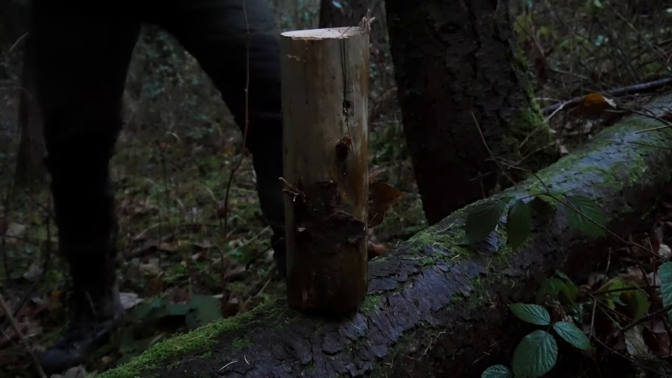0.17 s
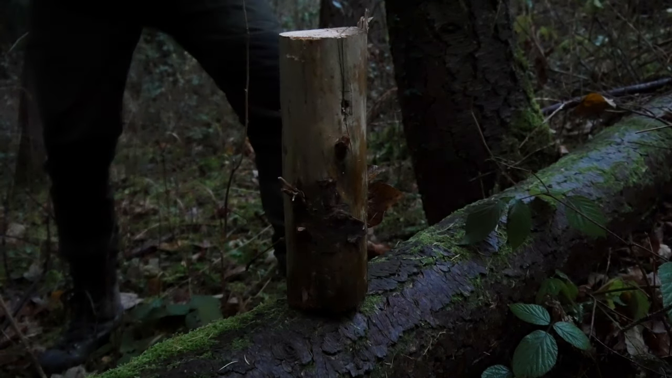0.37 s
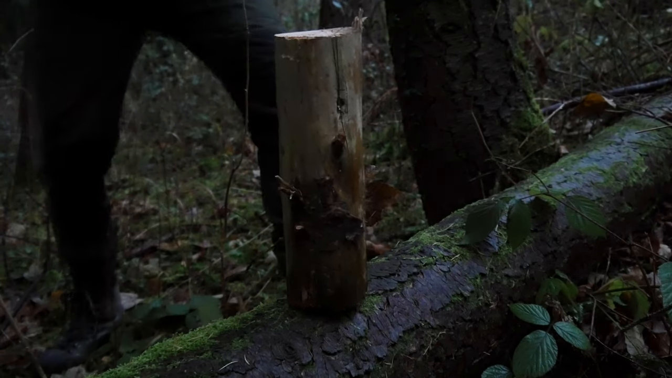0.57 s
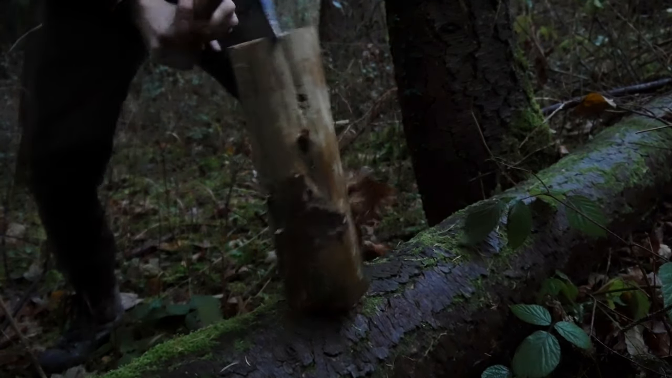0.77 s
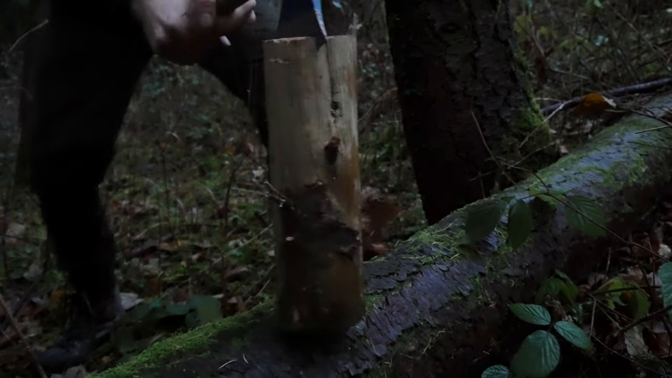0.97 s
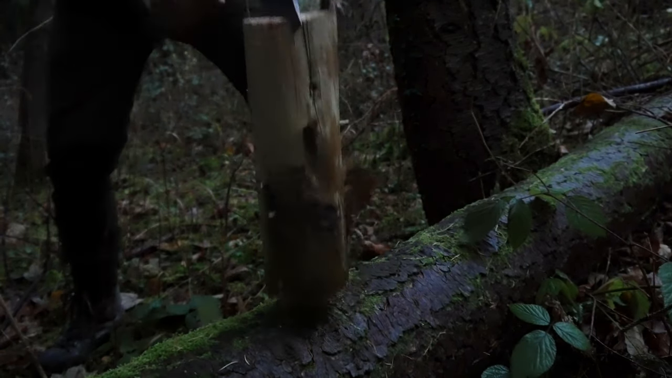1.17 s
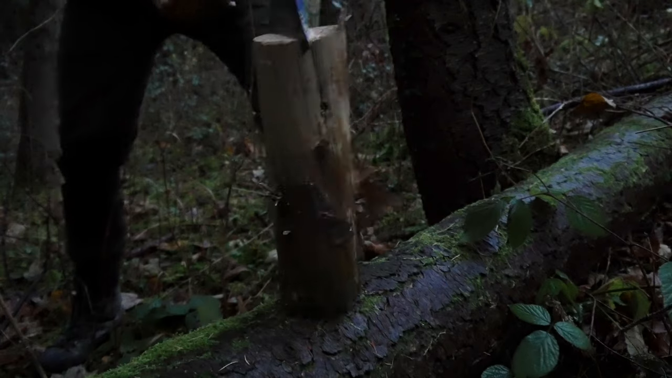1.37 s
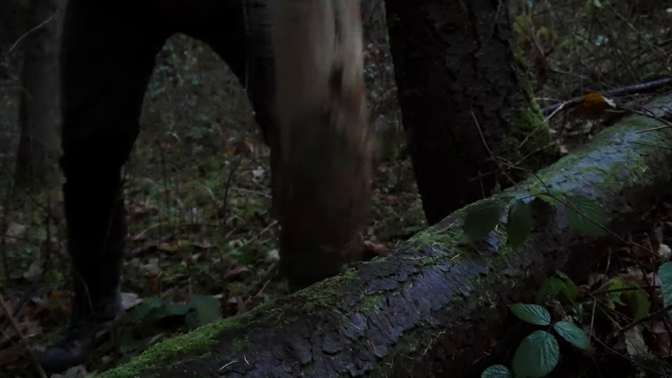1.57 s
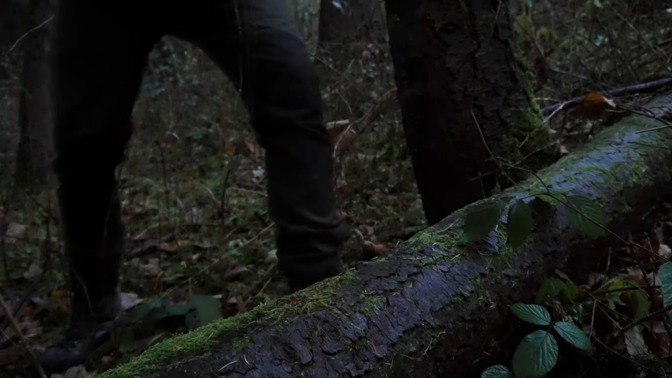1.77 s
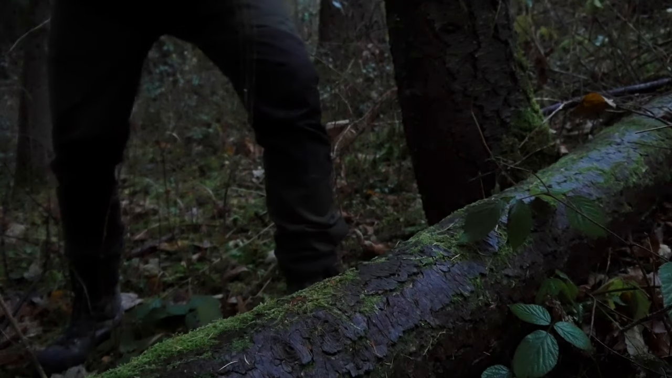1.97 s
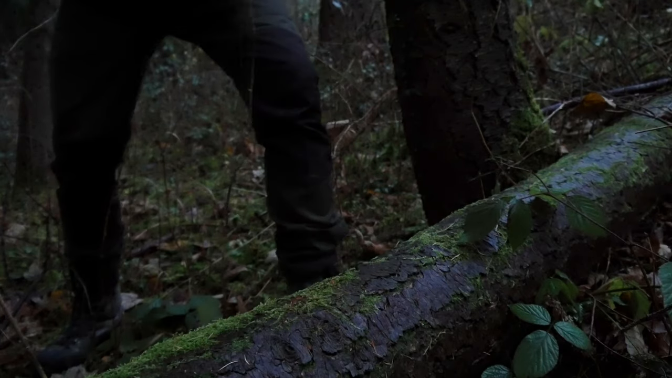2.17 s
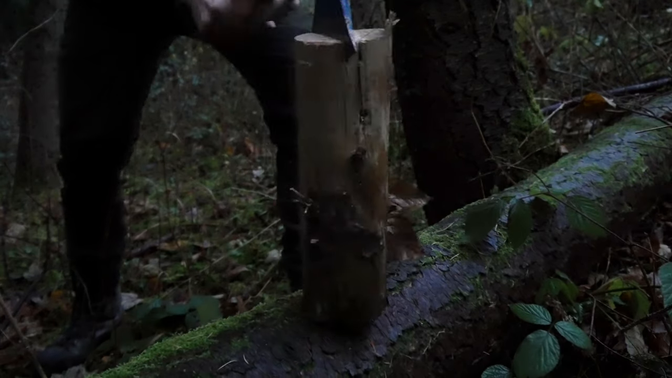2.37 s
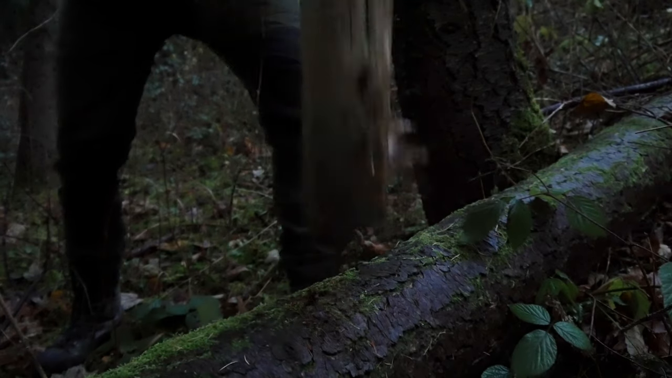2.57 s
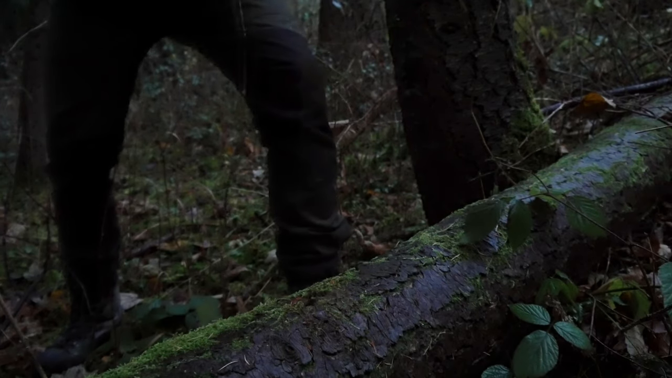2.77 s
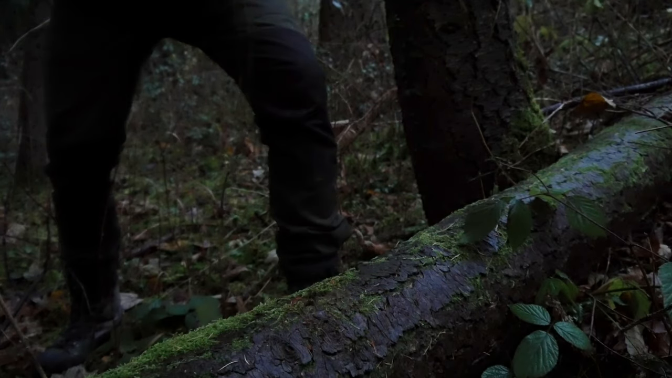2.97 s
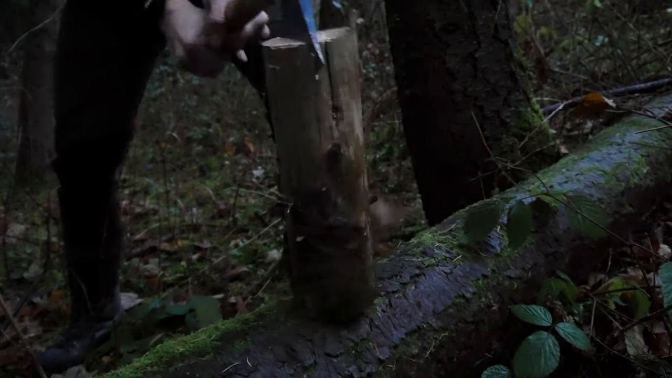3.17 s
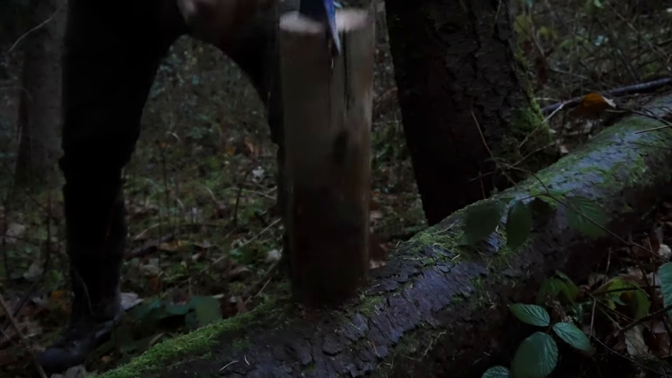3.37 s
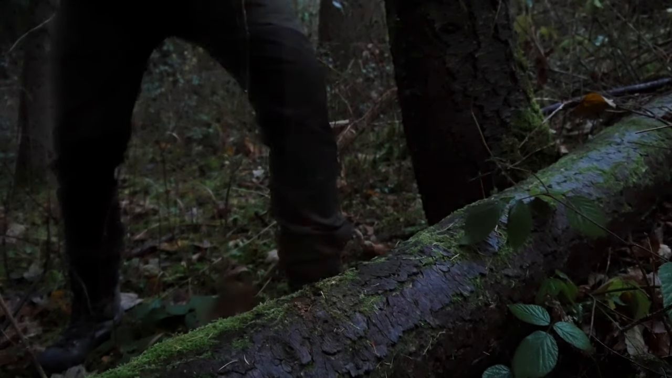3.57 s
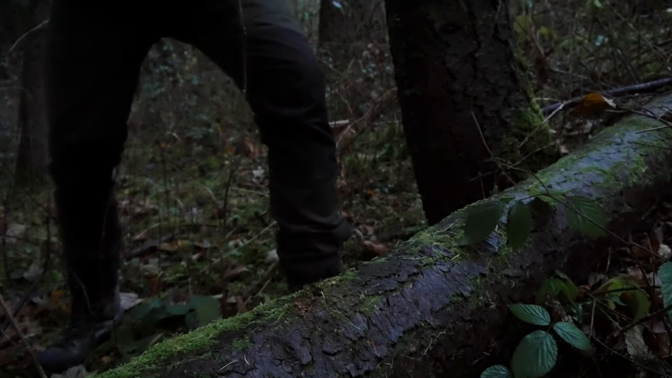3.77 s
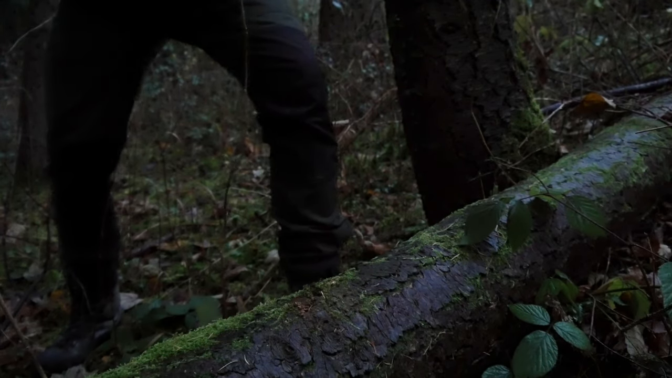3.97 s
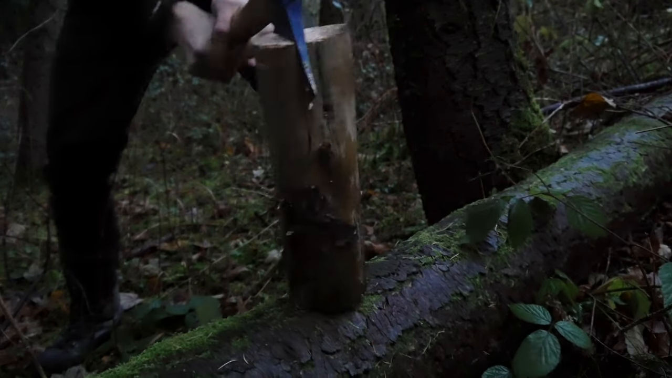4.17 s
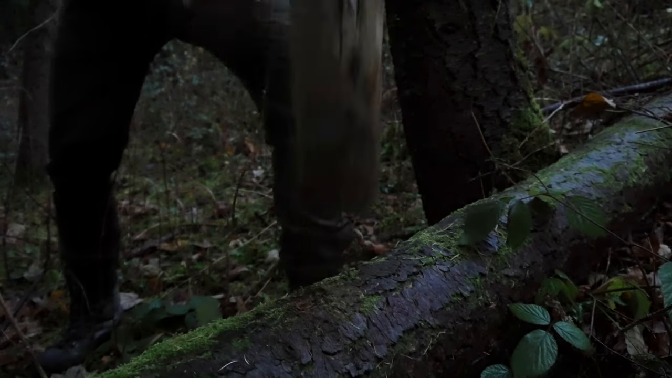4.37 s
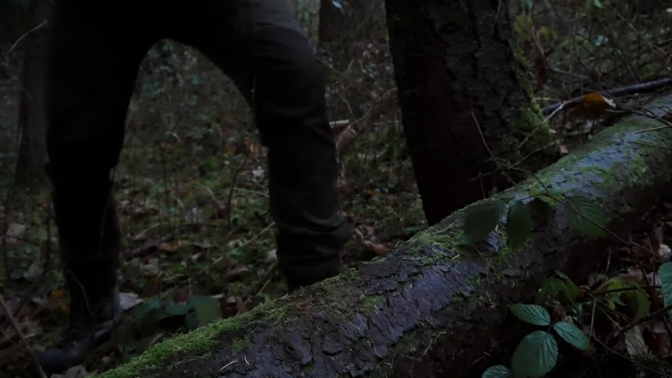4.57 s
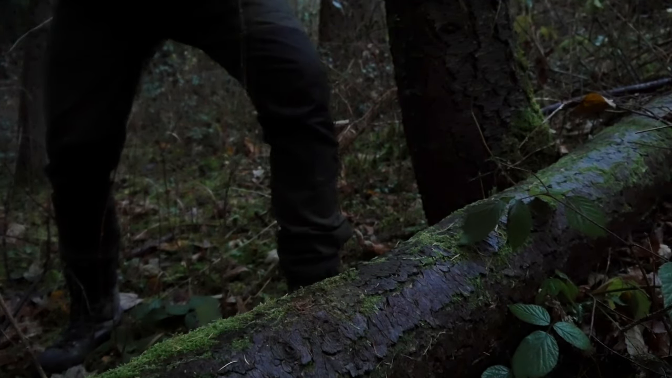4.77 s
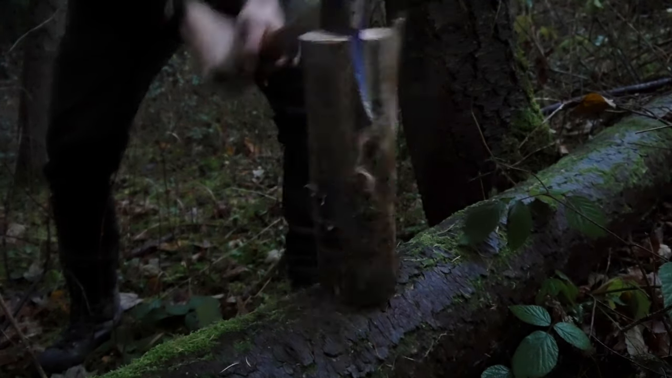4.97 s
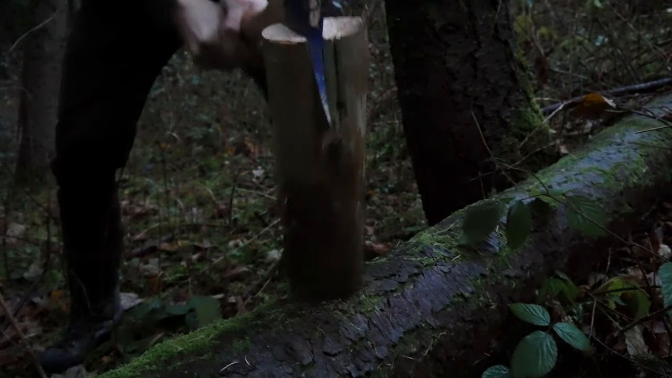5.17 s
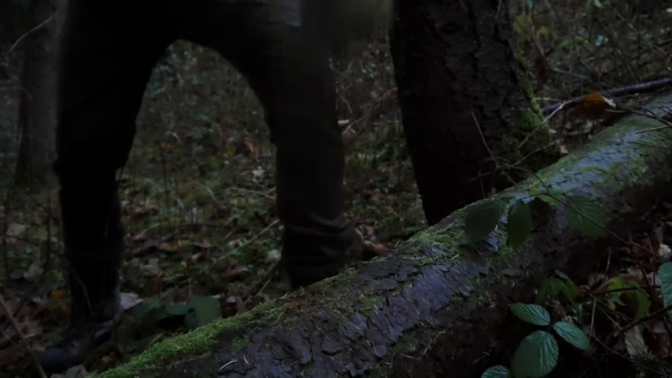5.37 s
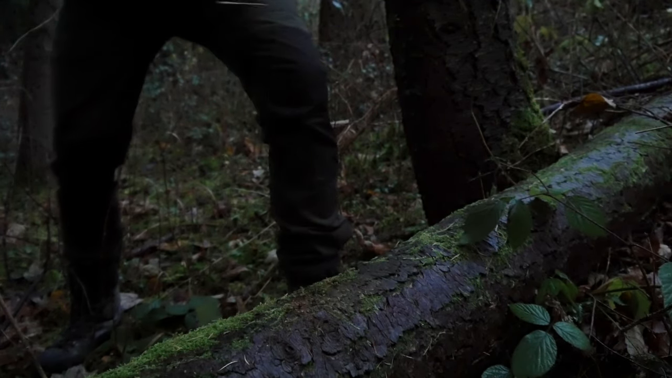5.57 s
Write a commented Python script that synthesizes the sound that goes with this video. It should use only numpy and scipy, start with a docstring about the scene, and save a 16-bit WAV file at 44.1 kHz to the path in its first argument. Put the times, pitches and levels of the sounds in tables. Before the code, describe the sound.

Five hard, overloaded wood-chopping blows, the first sharper and the rest heavier, ring off surrounding trees between faint bark ticks and clothing rustle.

```python
"""A forest murmurs; an axe bites into a round of firewood standing on a fallen trunk, and the round is set down softly.
Axe and round are then lifted together and slammed down four times; a small piece of metal clinks before the last slam.
Each blow sums noise bursts (crack), short swells (thud, bite, snap) and dying sines (ring), and echoes from the trees.
Between blows bark and twigs tick and clothes rustle, both as coloured noise.
The blows overload the recorder, whose gain control ducks the forest and lets it swell back."""
import sys
import numpy as np
from scipy import signal
from scipy.fft import rfft, irfft
from scipy.io import wavfile

SR = 44100
rng = np.random.default_rng(int(sys.argv[2]) if len(sys.argv) > 2 else 0)


def bounce(signal):
    """Save signal as a 16-bit WAV file at the path given by the first command-line argument."""
    frames = np.transpose(np.atleast_2d(signal))
    limited = np.clip(frames, -1, 1)
    pcm = np.round(limited * 32767).astype(np.int16)
    wavfile.write(sys.argv[1], SR, pcm)


N = 247842
TIME = np.arange(N) / SR   # s

# The blows of axe and round. Each row: start in seconds, crack level in dB, crack length in seconds,
# thud level in dB, bite level in dB, bite pitch in Hz, snap level in dB, snap pitch in Hz,
# pitch of the ring in the echo in Hz.
BLOW_EVENTS = [(0.7135, -4.5, 0.0029, -17.5, -5, 1223, -10, 4660, 1820),
               (2.26, -6, 0.0013, -1, 3, 686, -6.5, 1585, 1373),
               (3.1362, -5.5, 0.0033, 1, 1, 757, -9, 3630, 1770),
               (4.0605, -3.5, 0.004, -1, -8, 550, -8.5, 1420, 1527),
               (4.9606, -4.5, 0.0037, -1, -1, 1055, -0.5, 1620, 1703)]
# Spectrum of loose splinters and scuffed bark. Each row: frequency in Hz, relative level in dB per Hz.
SPLINTER_SPECTRUM = [(80, -35), (300, -11), (1000, -29), (1900, -3), (3000, -5.5), (5500, -7), (9000, -8.5),
                     (15000, -21)]
# Spectrum of the shuddering trunk. Each row: frequency in Hz, relative level in dB per Hz.
SHUDDER_SPECTRUM = [(45, -29), (90, -14), (140, -0.5), (280, 3), (420, -4), (600, -14.5), (1200, -39),
                    (3000, -60.5)]
# Spectrum of hissing clothes, also of the clink's tick. Each row: frequency in Hz, relative level in dB per Hz.
CLOTH_SPECTRUM = [(100, -35), (1500, -1), (3000, -0.5), (6000, -2), (8000, -3.5), (10500, -1), (13000, -10),
                  (15000, -15), (15800, -31)]

# ring of the wood after a thud of 0 dB; dB gained per dB of thud
RING_DB, RING_FOLLOWS = 2.5, 0.73


def from_db(db):
    """Level to amplitude: 20 dB is a factor of ten."""
    return 10 ** (np.asarray(db) / 20)


def rms_one(x):
    """Normalize the mean power to one."""
    return x / np.sqrt(np.mean(x ** 2) + 1e-20)


def at_hz(points, hz):
    """Interpolate a table on a logarithmic frequency axis."""
    table_hz, value = np.transpose(points)
    return np.interp(np.log(hz + 1), np.log(table_hz), value)


def noise(spectrum, alike=None, size=N):
    """Coloured stereo noise of rms 1: independent mid and side parts, weighted to set the correlation of the channels."""
    # Default for a diffuse field. Each row: frequency in Hz, left-right correlation from 0 to 1.
    likeness = [(60, 0.86), (200, 0.48), (600, 0.56), (1650, 0.58), (5000, 0.84), (15000, 0.81)]
    hz = np.arange(size // 2 + 1) * SR / size
    correlation = np.clip(at_hz(likeness, hz) if alike is None else alike, 0, 1)
    mid, side = rfft(rng.standard_normal((2, size))) * from_db(at_hz(spectrum, hz))
    opposed = side * [[1], [-1]]
    stereo = np.sqrt(1 + correlation) * mid + np.sqrt(1 - correlation) * opposed
    return rms_one(irfft(stereo, size))


def add(out, s, sound):
    """Superpose a sound from time s onwards."""
    at = round(s * SR)
    out[:, at:at + sound.shape[-1]] += sound[..., :N - at]


def high_pass(x, hz):
    """Second-order Butterworth filter that removes the bass."""
    return signal.sosfilt(signal.butter(2, hz, "high", fs=SR, output="sos"), x)


def ring(hz, t60):
    """A struck mode: a sine under exponential decay, kept for half a second."""
    t = TIME[:SR // 2]
    return np.sin(2 * np.pi * hz * t) * from_db(-60 * t / t60)


def burst(spectrum, length, t60, alike):
    """Friction or fracture noise: steady for its length, then an exponential decay; kept for 0.19 s."""
    t = TIME[:8192]
    decay = from_db(-60 * np.maximum(t - length, 0) / t60)
    return noise(spectrum, alike, size=len(t)) * decay


def swell(hz, rise):
    """A blunt, heavily damped contact: an oscillation that builds up over the rise time and soon dies."""
    t = TIME[:SR // 2]
    return np.sin(2 * np.pi * hz * t) * t / rise * np.exp(1 - t / rise)


def envelope(t, attack, hold, t60):
    """Silent before t = 0, then a straight rise, a hold and an exponential decay."""
    return np.clip(t / attack, 0, 1) * from_db(-60 * np.maximum(t - attack - hold, 0) / t60)


def forest(level_db=-49):
    """A diffuse sound field: steady noise that is only partly alike in the two channels."""
    # The murmur. Each row: frequency in Hz, relative level in dB per Hz.
    murmur = [(15, -40), (25, -29), (71, 2), (256, 1), (299, 0.5), (350, 3), (510, 3), (545, 2), (727, 1.5),
              (1080, 2), (1890, -8), (5000, -23), (6500, -57.5), (11000, -120)]
    return from_db(level_db) * noise(murmur)


def clothes(rest_db=-61, low_cut_hz=1500):
    """Friction of cloth: a hiss whose power adds up over every swing of the arms and shift of weight."""
    # The body shifts its weight. Each row: time of the peak in seconds, level in dB, half length in seconds.
    weight_shifts = [(0, -49.5, 0.058), (0.308, -51.5, 0.14), (1.82, -57.5, 0.066), (2.617, -52, 0.19),
                     (3.716, -51, 0.11)]
    # the arms speed up into each blow, then the cloth settles
    swing_db, swing_rise_s, swing_hold_s, swing_t60_s = -50, 0.12, 0.039, 3
    power = from_db(rest_db) ** 2
    for s, *_ in BLOW_EVENTS:
        since_start = TIME - s + swing_rise_s + swing_hold_s
        swing = from_db(swing_db) * envelope(since_start, swing_rise_s, swing_hold_s, swing_t60_s)
        power = power + swing ** 2
    for s, db, half in weight_shifts:
        shift = from_db(db) / (1 + ((TIME - s) / half) ** 2 / 2)
        power = power + shift ** 2
    return np.sqrt(power) * high_pass(noise(CLOTH_SPECTRUM), low_cut_hz)


def twigs(snap_s=0.0016, skirt_db=-20, top_db=-14):
    """Brittle fracture: short dry snaps of bark and twigs, each around its own pitch, plus faint random ticks."""
    # Clear snaps of bark and twigs. Each row: start in seconds, level in dB, centre frequency in Hz.
    snaps = list([(1.115, -49, 7700), (1.247, -47, 7050), (1.6419, -33, 2770), (1.648, -44, 2700),
                  (2.41, -42, 6000), (2.735, -43, 3950), (3.123, -31, 3500), (3.232, -37, 2950),
                  (3.747, -39.5, 2650), (4.352, -42, 9300), (5.269, -38, 3220), (5.347, -37.5, 3150),
                  (5.392, -40, 2840), (5.445, -40.5, 4000)])
    faint_per_s, faint_db, faint_spread_db, faint_hz = 4, -52, 3, 3160
    out = np.zeros((2, N))
    chance = rng.random((64, 3))
    waits = -np.log(1 - chance[:, 0]) / faint_per_s
    for s, (_, loudness, pitch) in zip(np.cumsum(waits), chance):
        if s < TIME[-1]:
            db = faint_db + faint_spread_db * (2 * loudness - 1)
            snaps.append((s, db, faint_hz * 2 ** (pitch - 0.5)))   # within half an octave
    for s, db, hz in snaps:
        colour = [(hz / 5, skirt_db), (hz, 0), (2 * hz, top_db), (4 * hz, skirt_db)]
        add(out, s, from_db(db) * burst(colour, snap_s, t60=0.024, alike=0.86))
    return out


def clinks(tick_db=-5):
    """Modal vibration of a small piece of metal: a hard tick excites a short bright ring."""
    # Each row: start in seconds, level in dB.
    clink_events = [(4.4678, -20)]
    # Modes of the metal. Each row: frequency in Hz, level relative to the clink in dB, 60 dB decay time in seconds.
    metal_modes = [(2500, -2.5, 0.012), (6650, -8, 0.043), (9740, 1, 0.0071), (11700, 0.5, 0.025),
                   (14200, -7, .013)]
    out = np.zeros((2, N))
    for s, db in clink_events:
        add(out, s, from_db(db + tick_db) * burst(CLOTH_SPECTRUM, length=0.00094, t60=0.0088, alike=0.92))
        for hz, mode_db, t60 in metal_modes:
            add(out, s, from_db(db + mode_db) * ring(hz, t60))
    return out


def bumps(scuff_lead=0.0048, low_mode_db=-19.5, shudder_db=-8, shudder_t60=0.095):
    """Friction, then impact: bark scuffs on bark, the weight lands and the trunk shudders."""
    # The round is set down softly. Each row: landing time in seconds, thud level in dB, scuff level in dB.
    landings = [(1.3649, -27, -41)]
    out = np.zeros((2, N))
    for s, thud_db, scuff_db in landings:
        scuff = burst(SPLINTER_SPECTRUM, length=0.0028, t60=0.046, alike=0.86)
        low_modes = swell(hz=178, rise=0.015) + 0.61 * swell(hz=97, rise=0.022)   # they build up slowly
        shudder = burst(SHUDDER_SPECTRUM, length=0.0042, t60=shudder_t60, alike=0.93)
        add(out, s - scuff_lead, from_db(scuff_db) * scuff)
        add(out, s, from_db(thud_db) * swell(hz=326, rise=0.0016))
        add(out, s, from_db(thud_db + low_mode_db) * low_modes)
        add(out, s, from_db(thud_db + shudder_db) * shudder)
    return out


def scatter(t, near_db, near_t60, wash_db, wash_t60, far_delay, far_attack, far_hold, far_t60):
    """Powers add in scattering: a splash from undergrowth, a wash from trees around, a late return from a distant stand."""
    near = from_db(near_db - 60 * t / near_t60)
    wash = from_db(wash_db - 60 * t / wash_t60)
    far = envelope(t - far_delay, far_attack, far_hold, far_t60)
    return np.sqrt(near ** 2 + wash ** 2 + far ** 2)


def far_trees(peak_db=-5, peak_width=0.066):
    """Multiple scattering: countless trunks turn each blow into a wash of noise that keeps the wood's ring."""
    # Low part of the echo. Each row: frequency in Hz, relative level in dB per Hz.
    low_colour = [(70, -22), (150, -12), (300, -9.5), (400, -2.5), (480, 1.5), (620, -5), (900, -9.5),
                  (1500, -41)]
    # Bright part of the echo. Each row: frequency in Hz, relative level in dB per Hz.
    bright_colour = [(400, -39), (800, -2.5), (1100, -6), (1400, 4), (1600, -2), (1850, -1), (2400, -7.5),
                     (5000, -12.5), (9000, -20.5), (15000, -38)]
    low_echo_db, bright_echo_db = -42.5, -41   # relative to the wood's ring and to the crack
    out = np.zeros((2, N))
    t = TIME[:SR * 6 // 5]
    low_shape = scatter(t, near_db=22.5, near_t60=0.14, wash_db=3.5, wash_t60=1.9,
                        far_delay=0.19, far_attack=0.034, far_hold=0.15, far_t60=1.47)
    bright_shape = scatter(t, near_db=18, near_t60=0.21, wash_db=6.5, wash_t60=1.66,
                           far_delay=0.14, far_attack=0.12, far_hold=0.12, far_t60=1.32)
    for s, crack_db, _, thud_db, *_, hz in BLOW_EVENTS:
        peak = [(hz / 2, -50), (hz / (1 + peak_width), -15), (hz, 0), (hz * (1 + peak_width), -15), (2 * hz, -50)]
        low = noise(low_colour, size=len(t))
        bright = noise(bright_colour, size=len(t)) + from_db(peak_db) * noise(peak, size=len(t))
        wood_db = RING_DB + RING_FOLLOWS * thud_db
        add(out, s, from_db(low_echo_db + wood_db) * low_shape * low)
        add(out, s, from_db(bright_echo_db + crack_db) * bright_shape * bright)
    return out


def trunks(x, bark_hz=510):
    """Discrete reflection: rough bark throws back only the low knock, louder on one side or the other."""
    # Nearby trunks. Each row: delay in seconds, mean level of the two sides in dB.
    reflections = [(.0168, -3), (.028, -15.5), (.043, -31)]
    dull = signal.sosfilt(signal.butter(4, bark_hz, fs=SR, output="sos"), x + 1e-18)
    out = np.zeros((2, N))
    for k, (delay, db) in enumerate(reflections):
        side_db = (-1) ** k * np.array([[1.5], [-1.5]])
        add(out, delay, from_db(db + side_db) * dull)
    return out


def blows(thud_hz=317, thud_rise=0.0018, bite_rise=0.0011, snap_rise=0.0011, crack_t60=0.025,
          splinter_t60=0.22, shudder_db=-27, shudder_t60=0.31, low_cut_hz=110):
    """Impact excitation: fibres crack, trunk thuds, blade bites and snaps; then wood modes ring and splinters fizz."""
    # Tearing fibres. Each row: frequency in Hz, relative level in dB per Hz.
    fibres = [(50, -27), (150, -3), (400, 5), (900, 2), (1600, 4), (2400, -4), (3400, -5.5), (5000, -4),
              (7500, -8.5), (10500, -4.5), (13000, -13.5), (16000, -31)]
    # The round with the axe in it. Each row: mode frequency in Hz, level relative to the ring in dB,
    # 60 dB decay time in seconds.
    wood_modes = [(128.6, -34, 0.44), (170, -33, 0.33), (397, -14.5, 0.15), (470, -17.5, 0.15),
                  (583, -24, 0.031), (810, -35, 0.026), (1485, -18.5, 0.072), (1766, -34, 0.2),
                  (3257, -13, 0.023), (4130, -32, 0.018)]
    # The whole round sways against the trunk. One row: frequency in Hz, level in dB, 60 dB decay time in seconds.
    hum_hz, hum_db, hum_t60 = (287, -26, 0.26)
    # fizz after a crack of 0 dB; dB gained per dB of crack
    fizz_db, fizz_follows = -17, 2.5
    hits, tails = np.zeros((2, 2, N))
    for s, crack_db, length, thud_db, bite_db, bite_hz, snap_db, snap_hz, _ in BLOW_EVENTS:
        add(hits, s, from_db(crack_db) * burst(fibres, length, crack_t60, alike=0.95))
        add(hits, s, from_db(thud_db) * swell(thud_hz, thud_rise))
        add(hits, s, from_db(bite_db) * swell(bite_hz, bite_rise))
        add(hits, s, from_db(snap_db) * swell(snap_hz, snap_rise))

        ring_db = RING_DB + RING_FOLLOWS * thud_db
        splinter_db = fizz_db + fizz_follows * crack_db
        add(tails, s, from_db(splinter_db) * burst(SPLINTER_SPECTRUM, 0, splinter_t60, alike=0.48))
        add(tails, s, from_db(ring_db + shudder_db) * burst(SHUDDER_SPECTRUM, 0, shudder_t60, alike=0.98))
        add(tails, s, from_db(hum_db) * ring(hum_hz, hum_t60))
        for hz, db, t60 in wood_modes:
            side_db = rng.normal(0, 4.7, (2, 1))   # each mode radiates more to one side
            add(tails, s, from_db(db + ring_db + side_db) * ring(hz, t60))
    # the blows carry little bass below the thud
    return high_pass(hits + tails + trunks(hits) + 1e-18, low_cut_hz)


def scene():
    """Superposition of everything heard from beside the trunk."""
    return forest() + clothes() + twigs() + clinks() + bumps() + far_trees() + blows()


def gain_control(x, threshold_db=-3, release_db_per_s=14, attack_s=0.0061):
    """Peak limiting with memory: loud peaks pull the gain down within milliseconds; it creeps back up."""
    level_db = 20 * np.log10(np.abs(x).max(axis=0) + 1e-9)
    over_db = np.maximum(level_db - threshold_db, 0)
    # the reduction holds each peak and falls from it at the release rate
    fall_db = release_db_per_s * TIME
    held_db = np.maximum.accumulate(over_db + fall_db) - fall_db
    r = np.exp(-1 / (attack_s * SR))
    reduction_db = signal.lfilter([1 - r], [1, -r], held_db)
    return x * from_db(-reduction_db)


def record(dry, rumble_hz=45, cutoff_hz=15900):
    """Gain control, soft saturation towards full scale, then band limiting of the rumble and the top."""
    x = gain_control(dry)
    clipped = x / (1 + x ** 6) ** (1 / 6)
    clipped = high_pass(clipped, rumble_hz)
    return signal.sosfilt(signal.ellip(10, 0.2, 85, cutoff_hz, fs=SR, output="sos"), clipped)


dry = scene()
out = record(dry)
bounce(out)
```